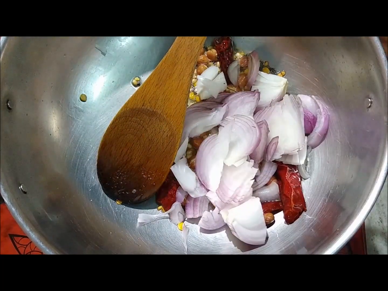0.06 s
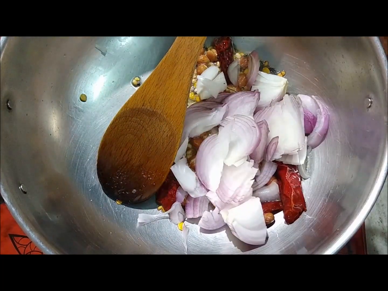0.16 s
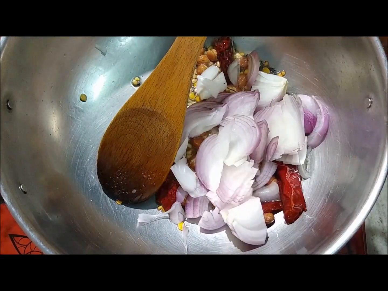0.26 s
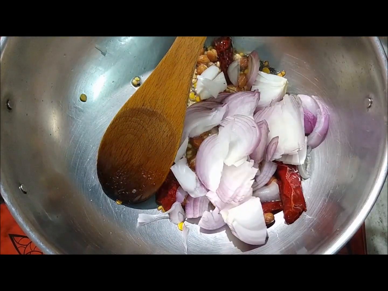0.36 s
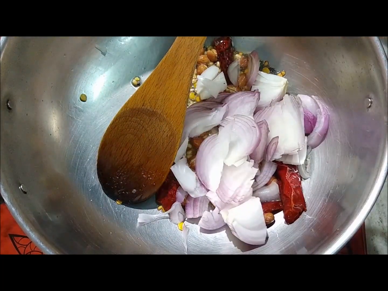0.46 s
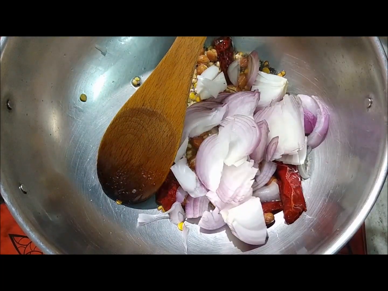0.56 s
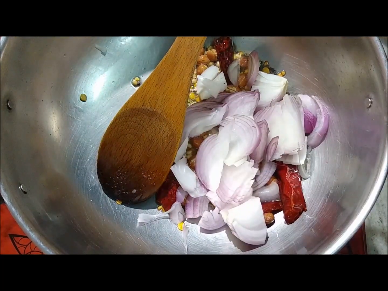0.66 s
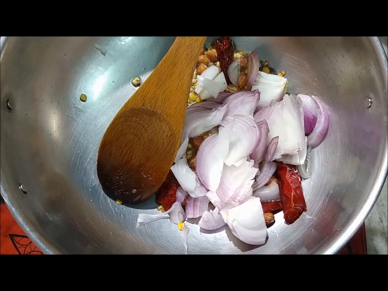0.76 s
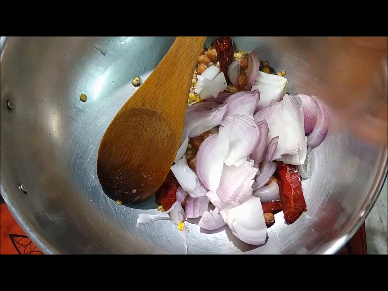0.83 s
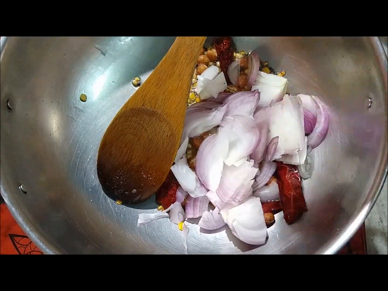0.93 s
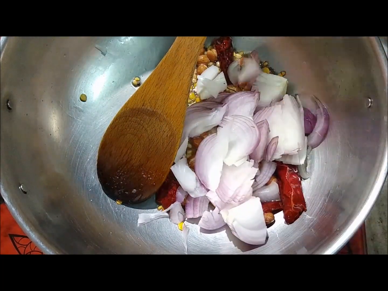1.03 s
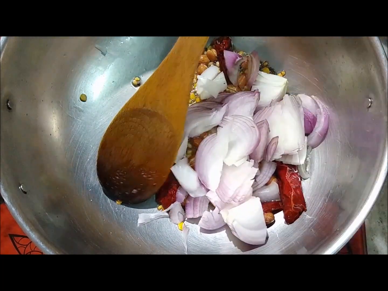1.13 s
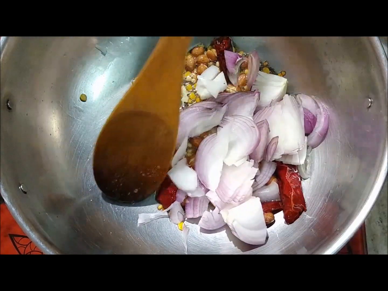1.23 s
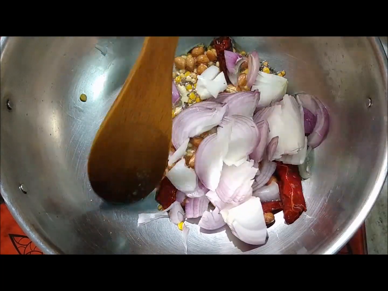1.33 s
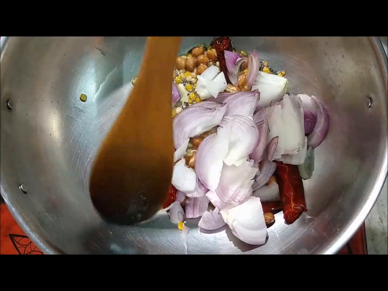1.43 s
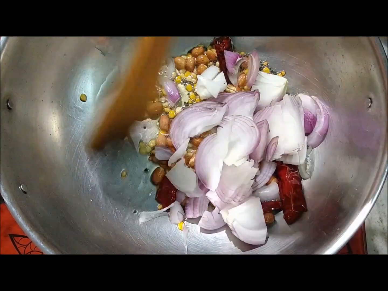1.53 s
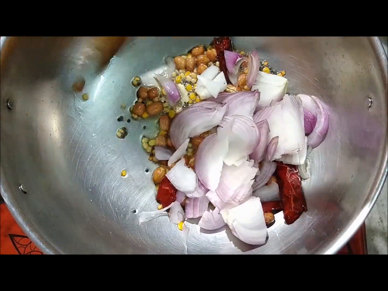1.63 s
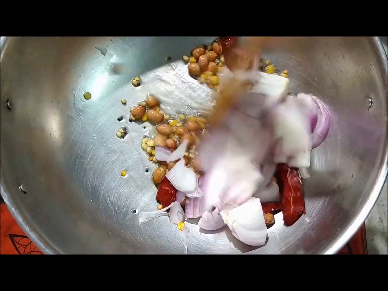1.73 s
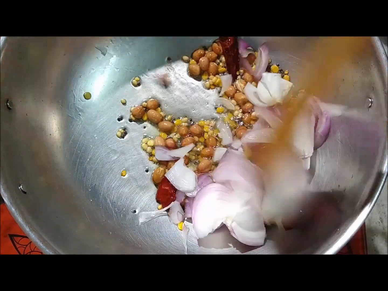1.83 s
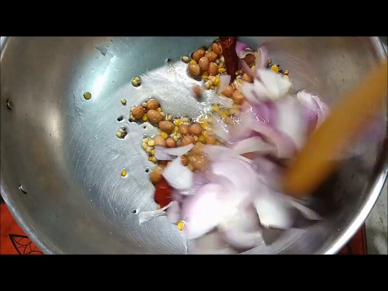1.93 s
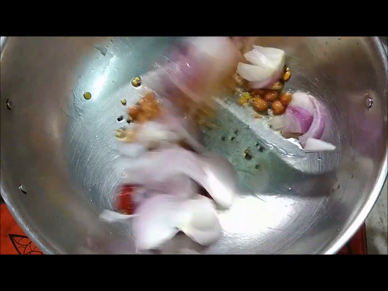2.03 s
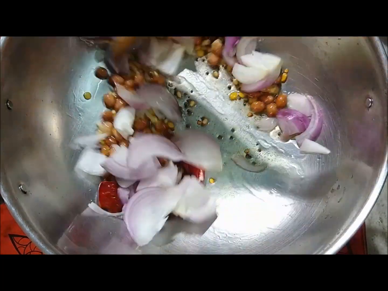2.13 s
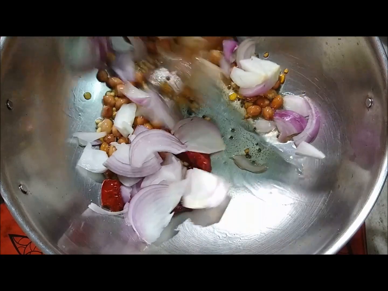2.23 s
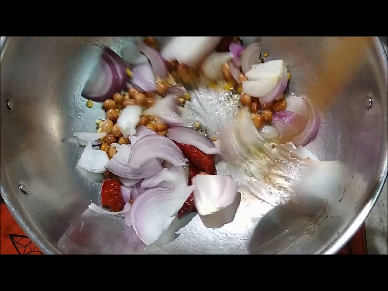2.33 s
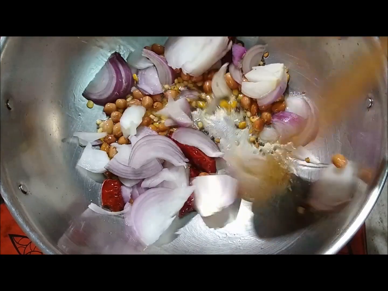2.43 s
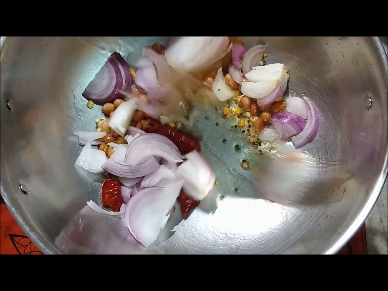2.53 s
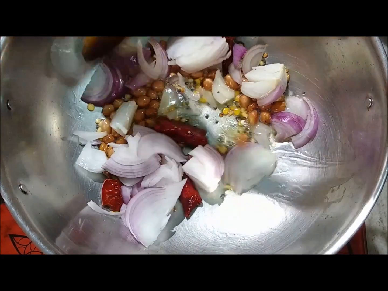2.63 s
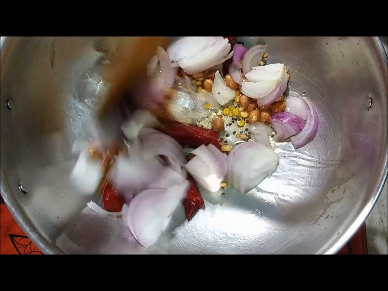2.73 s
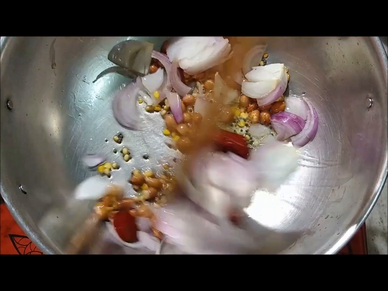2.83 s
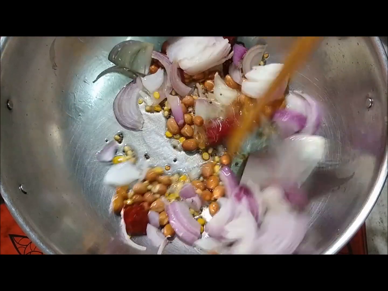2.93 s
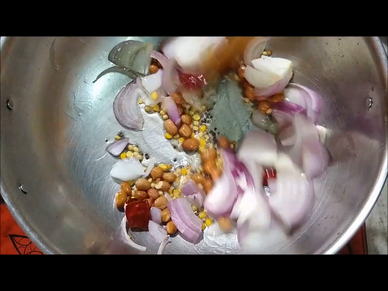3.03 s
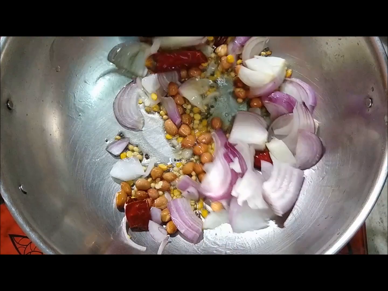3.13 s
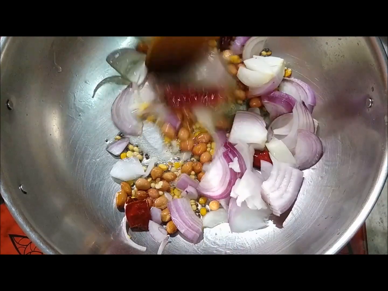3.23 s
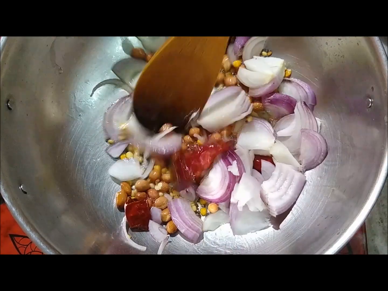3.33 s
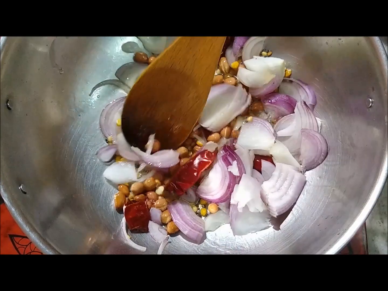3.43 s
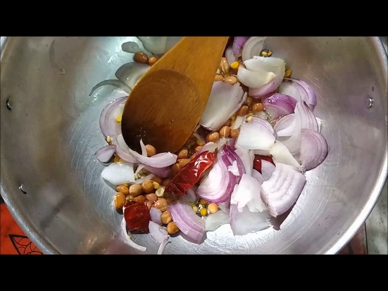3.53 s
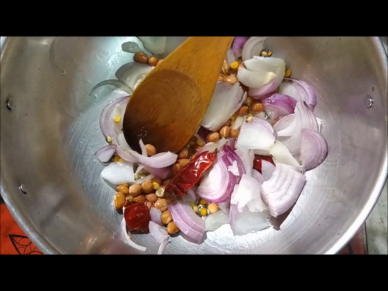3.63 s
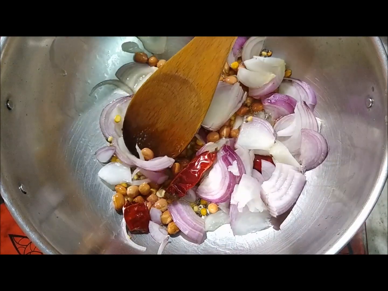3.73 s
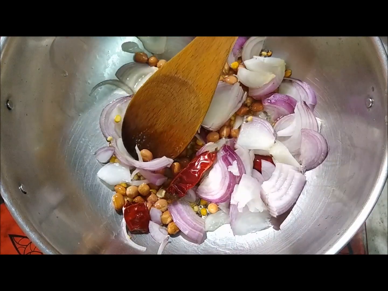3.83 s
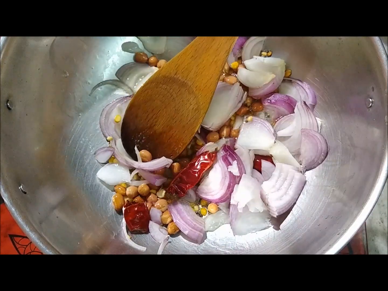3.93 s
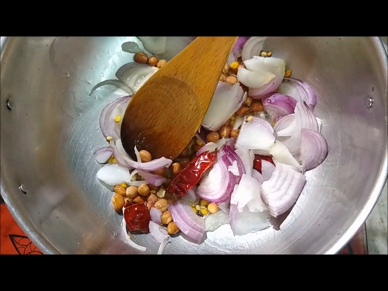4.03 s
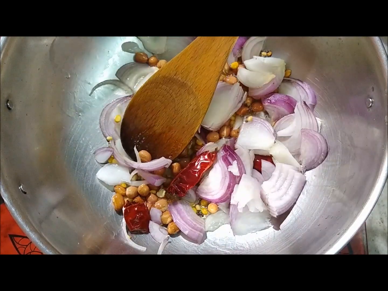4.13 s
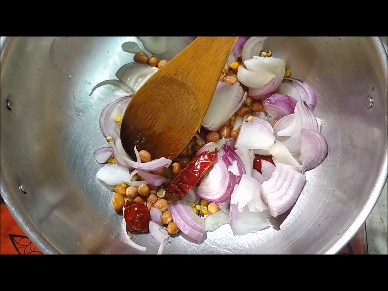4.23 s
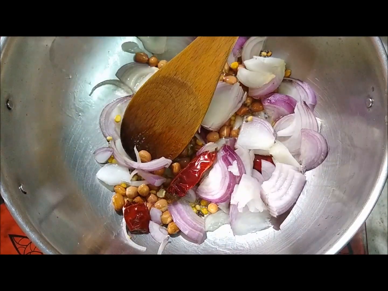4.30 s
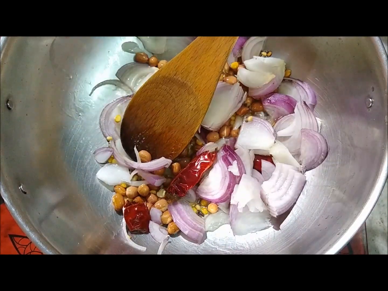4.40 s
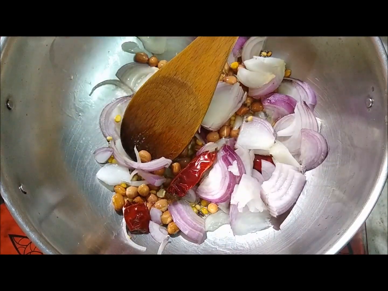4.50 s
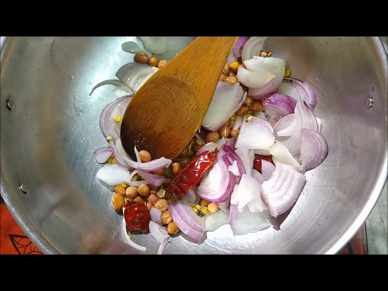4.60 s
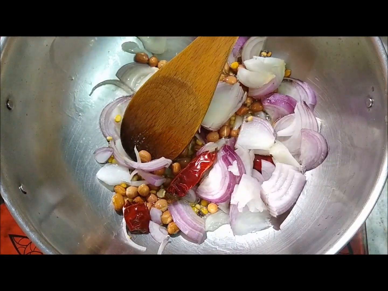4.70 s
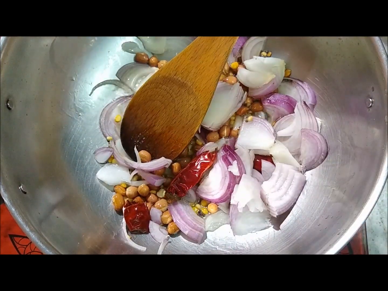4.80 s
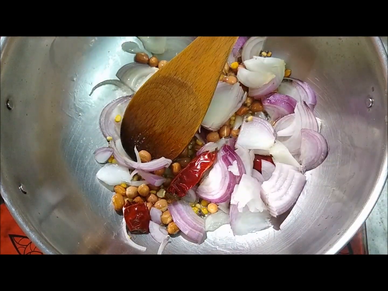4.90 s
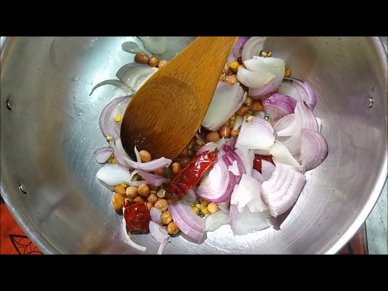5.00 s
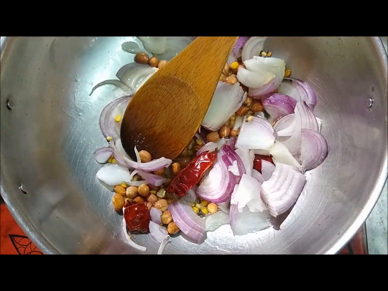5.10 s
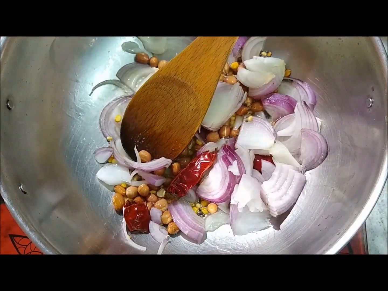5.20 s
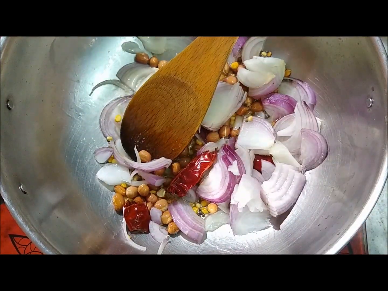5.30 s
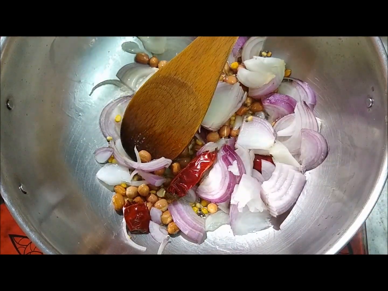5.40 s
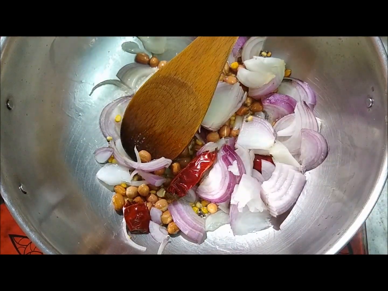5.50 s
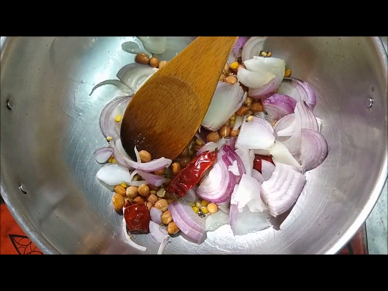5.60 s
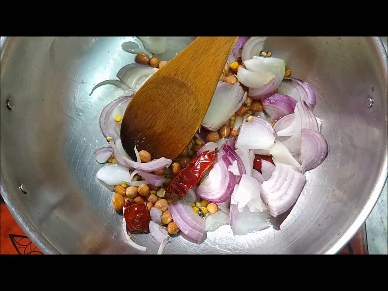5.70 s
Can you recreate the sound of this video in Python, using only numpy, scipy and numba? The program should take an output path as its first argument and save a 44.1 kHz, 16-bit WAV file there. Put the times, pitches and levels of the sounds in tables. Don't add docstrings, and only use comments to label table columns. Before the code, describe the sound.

Close stereo frying in a steel pan: steady bright fizz, dry snaps and deeper spits of oil. Quiet at first after a loud right-side thump, then vigorous stirring with dull wood knocks, metallic ringing and scraping, one loud chirp. After stirring stops, sizzling and seed-like taps go on, broken by a second massive thump, dip and gradual recovery. Faint low room hum, very short room tail.

```python
import sys
import numpy as np
from scipy import signal
from scipy.fft import rfft, irfft, next_fast_len
from scipy.io import wavfile
from scipy.ndimage import uniform_filter1d
from numba import njit

SR = 44100
rng = np.random.default_rng(int(sys.argv[2]) if len(sys.argv) > 2 else 0)


def invert_db(level):
    return 10 ** (np.asarray(level, dtype=float) / 20)


def persist_wave(psi):
    counts = np.round(np.clip(psi, -1, 1) * 32767).astype(np.int16)
    wavfile.write(sys.argv[1], SR, np.atleast_2d(counts).T)


N = 253575
T = np.arange(N) / SR
FAST = next_fast_len(N)
HZ = np.fft.rfftfreq(FAST, 1 / SR) + 1e-3
LOG_HZ = np.log(HZ)

# f/Hz, level/dB, t60/s
PAN_MODES = [(310, -17, 0.51), (660, 0.5, 0.097), (746, 1, .25), (1310, -14, 0.18), (1520, -9, .12),
             (2060, -8, .2), (2690, -10.5, 0.11), (2970, 2.5, .15), (3100, -7, .1), (3260, 1, .15),
             (3250, 7.5, .2), (3400, -10.5, .1), (3800, -10.5, .12), (4150, -9.5, .15)]
# f/Hz, level/dB
BED_TOP = [(15500, 0), (15900, -45)]


def frying(fizz_db, body_db):
    # f/Hz, level/dB per Hz
    fizz_colour = [(2500, -22), (4000, -0.5), (6000, -0.5), (8000, -4.5), (10500, -7), (14000, -5.5),
                   (15300, -5.5), (15900, -5.5)]
    body_colour = [(1200, -28), (1800, -5.5), (2500, 0.5), (3300, -1), (4200, 0.5), (5200, -21.5)]
    flare = walk(90)
    fizz = spread(fizz_colour, count=24000, lo_hz=3000, hi_hz=16000, cycles=6.1, spread_db=3.0, smooth_db=-5.5)
    body = spread(body_colour, count=9000, lo_hz=1790, hi_hz=5000, cycles=6.1, spread_db=3.5, smooth_db=-4)
    fizz_level = invert_db(fizz_db + 2.5 + 1.3 * flare + 2.0 * walk(260))
    body_level = invert_db(body_db + 1.1 + 0.64 * flare + 1.5 * walk(70))
    return fizz * fizz_level + body * body_level


def pops(gain):
    # t/s, peak/dB, f/Hz
    early_snaps = [(0.0149, -37, 5450), (0.0982, -50.5, 5460), (0.1157, -41.5, 4900), (0.3865, -46, 5140),
                   (0.401, -38, 5000), (0.4404, -38, 6740), (0.5731, -54, 5490), (0.6335, -57, 5570),
                   (0.6603, -36, 5160), (0.6918, -37.5, 4970), (0.6976, -37.5, 7900), (0.7622, -39, 5260),
                   (0.7751, -40, 5070), (0.7895, -35, 5000), (0.8793, -40.5, 4540), (0.8794, -35, 5800),
                   (0.9507, -41, 5660), (1.017, -44, 5700), (1.0548, -37, 4780), (1.1342, -43, 4860),
                   (1.1513, -51, 5670), (1.1636, -36, 6160), (1.2032, -36, 5420), (1.2481, -44, 5540)]
    main_snaps = [(1.3492, -32, 5200), (1.3971, -33, 5500), (1.454, -36, 5790), (1.5019, -42, 5730),
                  (1.5363, -34, 11200), (1.5724, -32, 5260), (1.6341, -33, 5300), (1.664, -27.5, 5560),
                  (1.683, -36, 4860), (1.706, -29, 7160), (1.7428, -24, 5360), (1.7633, -47, 5190),
                  (1.8177, -46, 5400), (1.8426, -39, 5660), (1.877, -35, 5510), (1.9449, -35, 4850),
                  (1.982, -30.5, 7800), (2.079, -33, 8200), (2.0905, -36, 5070), (2.123, -23, 5280),
                  (2.1414, -31, 5070), (2.214, -30, 4930), (2.284, -30, 5250), (2.339, -30.5, 5740),
                  (2.4039, -19.5, 5020), (2.4233, -34, 5710), (2.4534, -26.5, 5180), (2.4986, -27, 5500),
                  (2.5223, -28.5, 5050), (2.539, -29, 5600), (2.6428, -50, 4500), (2.6435, -30, 5470),
                  (2.683, -29, 5900), (2.7008, -26.5, 5630), (2.8019, -43, 5490), (2.827, -48, 4750),
                  (2.8273, -28, 7760), (2.8966, -30, 5560), (3.0229, -39, 5460), (3.1404, -32, 5340),
                  (3.269, -32, 4800), (3.2928, -35, 4850), (3.5343, -41, 5920), (3.5407, -36, 5930),
                  (3.61, -35, 5760), (3.623, -30, 5170), (3.627, -27, 5400), (3.8515, -44, 5970),
                  (3.8979, -43, 5750), (3.9174, -38, 6010), (3.958, -30, 5600), (3.9717, -28, 5670),
                  (4.036, -38, 5920), (4.1522, -31, 6200), (4.2343, -33, 5500), (4.2715, -28, 5280)]
    late_snaps = [(4.4031, -50.5, 6100), (4.443, -59, 11900), (4.443, -54, 5510), (4.464, -46, 6130),
                  (4.485, -38, 4700), (4.5055, -43, 5400), (4.5177, -36, 5790), (4.6336, -40.5, 5540),
                  (4.668, -39.5, 5700), (4.7418, -48, 5680), (4.757, -46.5, 5550), (4.782, -37, 5330),
                  (4.8316, -47, 5200), (4.8581, -45, 5640), (4.912, -37, 4800), (4.945, -38, 5500),
                  (5.0292, -45, 5200), (5.1103, -32.5, 7370), (5.1767, -44, 5280), (5.2437, -36, 5100),
                  (5.2725, -37, 5170), (5.3709, -27, 5800), (5.44, -28.5, 5160), (5.513, -36, 10100),
                  (5.536, -29, 5730), (5.5627, -31, 5500), (5.6283, -36, 5300), (5.7006, -38, 5110),
                  (5.7206, -35, 5500), (5.7276, -29, 4500)]
    # t/s, peak/dB, f/Hz
    deep_spits = [(0.1166, -42, 3370), (0.37, -43, 2670), (0.389, -43, 2680), (0.6867, -43, 3480),
                  (1.055, -39, 3430), (1.1344, -40, 3570), (1.3501, -20.5, 2640), (1.398, -14, 2740),
                  (1.665, -52, 3150), (1.6834, -25, 3320), (1.7746, -31, 3250), (1.8424, -27, 3270),
                  (1.8691, -14.5, 3250), (1.953, -27, 3230), (1.984, -27, 2760), (2.1017, -33, 3060),
                  (2.1474, -36, 2870), (2.287, -33, 3270), (2.3945, -24.5, 3480), (2.4524, -39, 3400),
                  (2.5794, -34, 3620), (2.608, -35, 3880), (2.6885, -35, 2800), (2.827, -30.5, 3700),
                  (2.839, -34, 3560), (2.8975, -33, 3170), (3.1393, -39, 3260), (3.225, -35, 3720),
                  (3.256, -31.5, 3500), (3.294, -35, 3180), (3.3109, -34, 3280), (3.4411, -30, 3500),
                  (3.523, -30, 3080), (3.5763, -30, 3500), (3.6283, -27.5, 3650), (3.709, -31.5, 2970),
                  (3.763, -38, 3800), (3.957, -31, 2680), (4.123, -35.5, 3400), (4.152, -37.5, 2590),
                  (4.256, -30.5, 2680), (4.2724, -34.5, 2610), (4.5475, -52, 2880), (4.952, -27.5, 3220),
                  (4.9934, -32.5, 3310), (5.031, -30.5, 4100), (5.0444, -30.5, 3500), (5.2173, -37, 3260),
                  (5.2724, -28.5, 3500), (5.3013, -30, 3420), (5.3706, -22.5, 2630), (5.409, -39, 3360),
                  (5.4388, -35, 3520), (5.496, -40, 3340), (5.5204, -37, 3530), (5.563, -42, 3680),
                  (5.6067, -39, 3400), (5.626, -37, 3270), (5.642, -30, 3560), (5.727, -32, 3570)]
    # ratio to f, level/dB
    snap_partials = [(.4, -11.5), (.7, -7), (1, 0), (1.2, -4.5), (1.45, -3.5), (1.75, -4.5), (2.1, -4.5),
                     (2.45, -6), (2.95, -4)]
    spit_partials = [(.5, -20), (.9, -4.5), (1, 0.5), (1.13, -4.5), (1.9, -13.5)]

    s, db, hz = np.transpose(early_snaps + main_snaps + late_snaps)
    when, luck, pitch = rng.random((230, 3)).T
    small_db = -42 + gain[(when * N).astype(int)] - 2.5 * (np.log(luck + .03) + 1)
    small_hz = 5600 * (.55 + .9 * pitch)
    s, db, hz = np.r_[s, when * N / SR], np.r_[db, small_db], np.r_[hz, small_hz]
    snaps = burst(s, hz, 0.0045 + 0 * s, db + 6.0, snap_partials, smear_s=0.00056, rise_s=.0004)

    s, db, hz = np.transpose(deep_spits)
    spits = burst(s, hz, 0.0077 + 0 * s, db + 4.0, spit_partials, smear_s=.0006, rise_s=.0004)
    return snaps + spits


def ticks():
    # t/s, peak/dB, f/Hz
    taps = [(0.116, -44.5, 1380), (0.387, -35, 1210), (0.421, -47, 1210), (0.491, -48, 1360),
            (0.687, -35, 690), (0.77, -44, 1440), (0.787, -37, 1310), (1.017, -43, 1310),
            (1.066, -42, 1330), (1.135, -27.5, 1310), (1.23, -55, 1290), (1.276, -43, 1280),
            (1.309, -41, 1370), (1.349, -26, 1660), (1.398, -29, 1580), (1.422, -35, 870),
            (2.491, -32.5, 705), (2.813, -43, 746), (3.139, -31.5, 1380), (3.254, -42, 1370),
            (3.444, -35, 1280), (3.54, -32.5, 783), (3.569, -28.5, 1760), (3.597, -28.5, 1290),
            (3.708, -39, 940), (3.907, -38, 1280), (3.957, -32.5, 980), (3.985, -33, 907),
            (4.055, -32, 1300), (4.087, -33, 1300), (4.123, -34, 714), (4.151, -32, 916), (4.196, -38, 830),
            (4.256, -27.5, 590), (4.411, -41, 1370), (4.55, -29, 1007), (4.684, -46, 1500),
            (4.844, -40, 760), (5.301, -34, 1496), (5.357, -48, 1100), (5.37, -23, 720),
            (5.448, -36.5, 867), (5.496, -45, 1510), (5.519, -40, 980), (5.537, -32.5, 1250),
            (5.63, -34, 1870)]
    partials = [(.75, -10), (1, -2), (1.35, -6.5), (2.2, 1), (3.1, -4.5)]
    s, db, hz = np.transpose(taps)
    return burst(s, hz, 0.0087 + 0 * s, db + 3.5, partials, smear_s=0.00041, rise_s=.0006)


def searing():
    # t/s, level/dB, rise/s, fade t60/s
    presses = [
        (1.7, -57, 0.028, 0.52),
        (3, -57, .02, 0.15),
        (4, -51, 0.017, 0.16),
    ]
    # f/Hz, level/dB per Hz
    sear_colour = [(3000, -18), (4500, -8.5), (6000, 2.5), (8000, -1.5), (10000, -30)]
    swell = np.zeros(N)
    for s, db, rise, t60 in presses:
        fade = invert_db(db - 60 * np.clip(T - s, 0, 3) / t60)
        swell += np.clip((T - s) / rise + 1, 0, 1) * fade
    hiss = spread(sear_colour, count=8000, lo_hz=3500, hi_hz=9000, cycles=5.8, spread_db=-3.5, smooth_db=5)
    return swell * invert_db(3.1 * walk(200)) * hiss


def knocks():
    # t/s, peak/dB, f/Hz, t60/s, steel ring/dB
    blows = [(1.53, -43.5, 764, 0.026, -28.5), (1.601, -35, 488, 0.053, -29),
             (1.653, -30.5, 328, 0.036, -43), (1.684, -35.5, 676, 0.039, -19),
             (1.843, -10, 660, 0.043, -34.5), (1.8435, -15, 484, 0.037, -47), (1.851, -18, 649, 0.055, -43),
             (1.868, -20, 516, 0.06, -29.5), (2.101, -33, 345, 0.038, -27.5),
             (2.11, -34, 624, 0.027, -32.5), (2.119, -29, 366, 0.028, -27), (2.195, -41.5, 690, 0.039, -31),
             (2.381, -31, 704, 0.019, -30), (1.774, -56, 689, 0.014, -28), (1.799, -40, 680, 0.019, -28),
             (2.319, -33.5, 883, 0.02, -25.5), (2.329, -41.5, 209, 0.082, -41.5),
             (2.181, -44, 239, 0.053, -37.5), (2.595, -15.5, 660, 0.018, -37),
             (2.603, -31.5, 564, 0.035, -37), (2.85, -18.5, 670, 0.016, -48), (3.112, -33, 613, 0.021, -26),
             (3.439, -44.5, 730, 0.032, -10)]
    # t/s, f/Hz, level/dB, t60/s
    singing_modes = [(0.131, 328, -63, 0.32), (0.201, 274, -61, 0.24), (0.331, 316, -54, 0.27),
                     (0.369, 396, -58, 0.18), (1.69, 682, -40, 0.48), (1.685, 3274, -31, 0.19),
                     (1.69, 3800, -48, .15), (1.8, 4100, -45, 0.55), (1.869, 3217, -16, 0.22),
                     (1.893, 2940, -20, 0.15), (1.96, 2060, -40, 0.69), (2.319, 3850, -40, .15),
                     (2.64, 310, -49.5, 1.26), (3.83, 710, -47.5, 0.24), (5.089, 354, -57.5, 0.31),
                     (5.14, 348, -63, 0.35), (5.241, 357, -52, 0.16), (5.41, 357, -52, 0.16)]
    overtones = [(.5, -9.5), (.8, -4.5), (1.3, -11.5), (1.9, -14), (3.0, -20.5)]

    s, db, hz, t60, ring_db = np.transpose(blows)
    rise_s = 0.00047
    wood = rings(s, hz, t60, invert_db(db - 2.5), rise_s)
    wood = wood + burst(s, hz, t60, db, overtones, smear_s=0.00046, rise_s=rise_s)

    pan_hz, pan_db, pan_t60 = np.transpose(PAN_MODES)
    modes = len(pan_hz)
    luck_db = 2.0 * rng.standard_normal((len(s), modes)) - 3.9 * np.log2(pan_hz / 700)
    mode_db = (db + ring_db)[:, None] + pan_db + luck_db
    steel = rings(np.repeat(s, modes), np.tile(pan_hz, len(s)), np.tile(pan_t60, len(s)), invert_db(mode_db.ravel()))

    s, hz, db, t60 = np.transpose(singing_modes)
    singing = np.array([rings(s + lag, hz, t60, invert_db(db), .006) for lag in (0.00017, 0.)])
    return wood + steel + singing * invert_db(3.3 * walk(75) - 3.5)


def strokes():
    # t/s, level/dB, fade t60/s, wet/dB, steel/dB
    stroke_events = [(0.01, -39, 0.11, -16, -60), (.125, -60.5, 0.93, -5.5, -60),
                     (.34, -64.5, 0.71, -11, -60), (0.761, -65, 0.36, 8.5, -60),
                     (1.409, -62.5, 0.11, 19, -60), (1.62, -54, 1.2, -21.5, -38), (1.69, -52, 1.1, 4.5, -8),
                     (1.851, -29.5, 0.2, -10.5, -23.5), (1.875, -32.5, 0.24, -1, -4),
                     (1.905, -37.5, 0.58, -3, -22), (2.1, -49.5, 1.6, -3, -20.5),
                     (2.178, -47, 0.58, -5.5, -14.5), (2.25, -53.5, 1.6, -9, -20),
                     (2.31, -45.5, 0.77, 2, -14), (2.38, -47.5, 0.82, -9.5, -20),
                     (2.601, -40.5, 0.4, -10, -8), (2.67, -50, 0.2, -3, -25.5),
                     (2.857, -41, 0.31, -20, -40), (4.255, -49, 0.2, -13, -40), (3.38, -56, 1.2, 5, -40),
                     (5.3, -59, 1.4, -15, -40)]
    s, db, t60, wet_db, steel_db = np.transpose(stroke_events)[..., None]
    t = T[::64]
    rise = np.clip((t - s) / 0.02 + 1, 0, 1)
    power = (rise * invert_db(db - 60 * np.clip(t - s, 0, 3) / t60)) ** 2
    return [np.interp(T, t, np.sum(power * invert_db(2 * share_db), axis=0)) for share_db in (0 * db, wet_db, steel_db)]


def stirring(rumble_db, rattle_db, scrape_db):
    # f/Hz, level/dB per Hz
    rumble_colour = [(60, -45), (120, -11), (200, -8), (400, -5), (700, 1.5), (900, -1.5), (1300, -36)]
    rattle_colour = [(700, -18), (950, -3), (1300, 3.5), (1700, 3), (2200, 0), (3000, -21.5)]
    # start t/s, end t/s
    scrape_span = (1.67, 2.7)
    low = spread(rumble_colour, count=3000, lo_hz=150, hi_hz=1100, cycles=4.6, spread_db=1.2, smooth_db=7.0)
    mid = spread(rattle_colour, count=5000, lo_hz=770, hi_hz=2620, cycles=6.2, spread_db=1.5, smooth_db=-5)

    hz, db, t60 = np.transpose(PAN_MODES)
    when, which, luck, detune = rng.random((700, 4)).T
    s = scrape_span[0] + when * np.ptp(scrape_span)
    mode = (which * len(hz)).astype(int)
    catch_hz = hz[mode] * (1 + 0.0072 * (detune - .5))
    size = invert_db(np.interp(s, T, scrape_db) + db[mode] - 5.5 * np.log(luck + .003) - 6)
    steel = np.array([rings(s + lag, catch_hz, 0.7 * t60[mode], size) for lag in (.00015, 0.)])

    shuffle = low * invert_db(rumble_db - 1.0 + 1.6 * walk(12)) + mid * invert_db(rattle_db - 0.5 + 3.1 * walk(30))
    return shuffle + steel


def squeak():
    # start t/s, length/s, f/Hz, level/dB, overtones/dB
    slips = [
        (2.3945, 0.00965, 745, -11.5, -19.5),
        (3.802, 0.0205, 690, -40, -18),
        (3.6, 0.0364, 690, -52, -26),
    ]
    out, t = np.zeros(N), np.arange(SR // 2) / SR
    for start, length, hz, db, over_db in slips:
        grip = np.clip((length - t) / 0.0018, 0, 1)
        ring_on = 0.63 * invert_db(-60 * np.abs(t - length) / 0.013) + 0.034 * invert_db(-60 * t / 0.17)
        swell = grip * (0.39 + 0.92 * t / length) + (1 - grip) * ring_on
        turn = 2 * np.pi * hz * t
        overtones = np.sin(2 * turn) + 1.4 * np.sin(2.6 * turn) + 0.36 * np.sin(5.2 * turn)
        tone = np.sin(turn) + grip * invert_db(over_db) * overtones
        chirp = invert_db(db - 1.5) * swell * tone * np.clip(t / 0.00092, 0, 1)
        out += np.pad(chirp, (int(start * SR), N))[:N]
    return out


def thumps():
    # t/s, peak/dB, direction, ring f/Hz, spike share/0-1
    drops = [
        (0.0163, -0.5, 1, 138, 0.77),
        (2.396, -16.5, 0.77, 110, 0.46),
        (2.5, -30.5, 0.97, 150, 0.05),
        (4.235, -32, 0.62, 150, 0),
        (2.6885, -13, 0.94, 151, .15),
        (2.827, -21, 0.8, 147, 0),
        (2.8974, -9, -0.92, 133, 0.64),
        (4.2714, -16.5, 0.96, 150, 0),
        (4.2735, -1, 0.91, 137, 0.68),
        (4.9122, -22.5, 0.88, 150, 0.24),
    ]
    out = np.zeros(N)
    t = np.arange(SR // 10) / SR
    for s, db, sign, hz, spike in drops:
        swing = np.cos(2 * np.pi * hz * t + 0.56) * invert_db(-60 * t / 0.024)
        swing += 0.18 * np.sin(2 * np.pi * 0.42 * hz * t) * invert_db(-60 * t / 0.095)
        click = np.exp(-t / 0.00023)
        shape = ((1 - spike) * swing + spike * click) * (1 - np.exp(-t / .0001))
        out[int(s * SR):int(s * SR) + len(t)] += sign * invert_db(db + 5.5) * shape
    return np.array([0 * out, out])


def draught(gain):
    # f/Hz, level/dB per Hz
    air_colour = [(20, -9.5), (40, -10.5), (60, 4), (90, -4), (150, 1.5), (280, -11.5), (400, -15)]
    # t/s, level/dB
    air_level = [(.1, -55), (.7, -53), (1.7, -57.5), (2.0, -57.5), (2.7, -69), (3.2, -66.5), (4.6, -63.5),
                 (5.3, -60), (5.75, -66)]
    noise = rfft(rng.standard_normal((2, FAST)))
    air = irfft(noise * invert_db(along(air_colour) + along(BED_TOP)), FAST)[:, :N]
    return air / air.std() * invert_db(0.96 * gain + curves(air_level)[0])


def kitchen(hits):
    # f/Hz, level/dB
    mic_low_cut = [(40, -36), (120, 1), (250, 1.5)]
    t = np.arange(SR // 5) / SR
    tail = rng.standard_normal((2, len(t))) * invert_db(-60 * t / 0.19 - 36.5)
    room = 1 + rfft(tail, FAST) * invert_db(along(BED_TOP))
    return irfft(hits * room * invert_db(along(mic_low_cut)), FAST)[:, :N]


def gain_db():
    # t/s, depth/dB
    dip_events = [
        (.022, -19),
        (1.99, 0.5),
        (2.42, -4),
        (2.9, -3),
        (4.276, -15.5),
    ]
    dips = []
    for s, depth_db in dip_events:
        climb = np.minimum(0, depth_db + 12 * (T - s))
        dips.append(climb * np.clip((T - s) / 0.016 + .5, 0, 1))
    return np.min(dips, axis=0)


def spread(colour, **grain):
    # f/Hz, share heard by both/0-1
    shared_part = [(100, 0.36), (400, 0.84), (1200, 0.49), (2200, 0.58), (4000, 0.083), (9000, 0.17)]
    right, other = (rfft(bubbles(**grain), FAST) for _ in "ab")
    like = np.clip(along(shared_part), 0, 1)
    late = np.exp(-2j * np.pi * HZ * .0001)
    left = like * right * late + np.sqrt(1 - like ** 2) * other
    pair = irfft(np.array([left, right]) * invert_db(along(colour) + along(BED_TOP)), FAST)[:, :N]
    return pair / pair.std()


def bubbles(count, lo_hz, hi_hz, cycles, spread_db, smooth_db):
    when, pitch, luck, length = rng.random((count, 4)).T
    hz = lo_hz * (hi_hz / lo_hz) ** pitch
    size = invert_db(-spread_db * np.log(luck + 0.0038)) * np.sqrt(hz)
    grains = rings(when * N / SR, hz, cycles * (.5 + length) / hz, size)
    return grains / grains.std() + invert_db(smooth_db) * rng.standard_normal(N)


def burst(s, hz, t60, db, ratios, smear_s, rise_s):
    out = np.zeros((2, N))
    draws = np.moveaxis(rng.standard_normal((len(s), 2, len(ratios), 2)), 0, -1)
    for side, off in zip(out, draws):
        for (k, g_db), (late, detune) in zip(ratios, off):
            start = s + smear_s * abs(late)
            partial_hz = np.clip(hz * k * (1 + 0.062 * detune), 50, .4 * SR)
            partial_t60 = np.clip(t60, .001, .5) / k ** .5
            side += rings(start, partial_hz, partial_t60, invert_db(db + g_db), max(rise_s, 1e-5))
    return out


@njit
def rings(start, hz, t60, size, rise_s=1e-5):
    out, q = np.zeros(N), np.exp(-1 / (rise_s * SR))
    for k in range(len(start)):
        p = np.exp(2j * np.pi * hz[k] / SR - np.log(1000) / (t60[k] * SR))
        z, shut = size[k] + 0j, 1.
        first = max(0, int((start[k] - rise_s) * SR))
        last = min(N, int((start[k] + .8 * t60[k]) * SR))
        for i in range(first, last):
            z *= p
            shut *= q
            out[i] += z.imag * (1 - shut) ** 2
    return out


def walk(rate):
    k = int(SR / rate)
    held = np.repeat(rng.standard_normal(N // 100), k)[:N]
    return 1.34 * uniform_filter1d(uniform_filter1d(held, k), k)


def along(table, axis=1):
    rows = np.array(table)
    return np.interp(LOG_HZ, np.log(rows[:, 0]), rows[:, axis])


def curves(table):
    s, *columns = np.transpose(table)
    return [np.interp(T, s, c) for c in columns]


def plus(rest_db, power, share_db):
    return 10 * np.log10(invert_db(2 * rest_db) + power * invert_db(2 * share_db))


def scene():
    # t/s, level/dB
    boil_curve = [(.05, -13), (.105, -0.5), (.125, 2), (.3, -1), (.55, 0.5), (.75, -1), (1.05, -1.5),
                  (1.4, -1.5), (1.8, -2.5), (2.7, 1), (3.1, -3.5), (3.55, 2), (3.72, -1.5), (4.25, 1),
                  (4.5, 5.5), (4.65, 2.5), (5.5, -1), (5.75, -0.5)]
    # f/Hz, level/dB
    snap_low_cut = [(150, -20), (450, -9.5), (800, -0.5)]
    gain = gain_db()
    boil = curves(boil_curve)[0]
    dry_power, wet_power, steel_power = strokes()
    fizz_db = plus(-51 + gain + boil, wet_power, -7.5)
    body_db = plus(-50 + gain + 0.99 * boil, wet_power, 0)
    rumble_db = plus(-61.5 + gain + 0.27 * boil, dry_power, 0)
    rattle_db = plus(-57 + gain + 0.61 * boil, dry_power, -5)
    scrape_db = plus(-90.5, steel_power, 0)

    small_hits = rfft(pops(gain) + ticks(), FAST) * invert_db(along(snap_low_cut))
    spoon_hits = rfft(knocks() + squeak(), FAST)
    beds = frying(fizz_db, body_db) + searing() + stirring(rumble_db, rattle_db, scrape_db) + draught(gain)
    return beds + kitchen(small_hits + spoon_hits) + thumps()


def roll_off(x):
    return signal.sosfilt(signal.butter(12, 16790, fs=SR, output="sos"), x)


def record(dry):
    # f/Hz, right into left, left into right, lag/samples, left port louder/dB
    cross_feed = [(100, 0.68, 0.25, 24, 2), (1000, 0.61, 0.48, 20.4, -1), (2200, 0.73, 0.57, 20.26, 0),
                  (4450, 0.37, 0.41, 20.15, 0.5), (6700, 0.31, 0.25, 19.7, 1), (9000, 0.15, 0.12, 19.7, 4),
                  (10400, .55, 0.5, 20.67, 0.7), (12700, .33, 0.25, 20.8, -1.3),
                  (15300, 0.1, .1, 20.8, -3.8)]
    # f/Hz, level/dB
    mic_top_cut = [(15750, 0.5), (16000, -20), (16800, -44.5)]
    tilt_db = along(cross_feed, axis=4) / 2
    left, right = rfft(dry, FAST) * invert_db(along(mic_top_cut) + np.array([tilt_db, -tilt_db]))
    late = np.exp(-2j * np.pi * HZ * along(cross_feed, axis=3) / SR)
    wide_left = left - along(cross_feed, axis=1) * late * right
    wide_right = right - along(cross_feed, axis=2) * late * left
    wide = irfft(np.array([wide_left, wide_right]), FAST)[:, :N]
    return roll_off(wide)


dry = scene()
out = record(dry)
persist_wave(out)
```